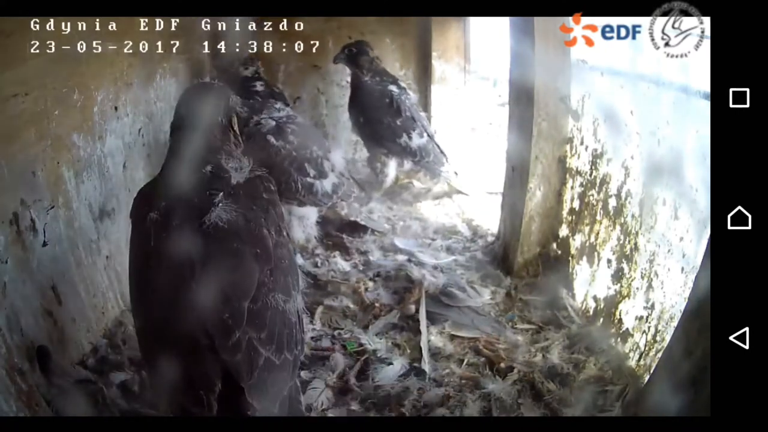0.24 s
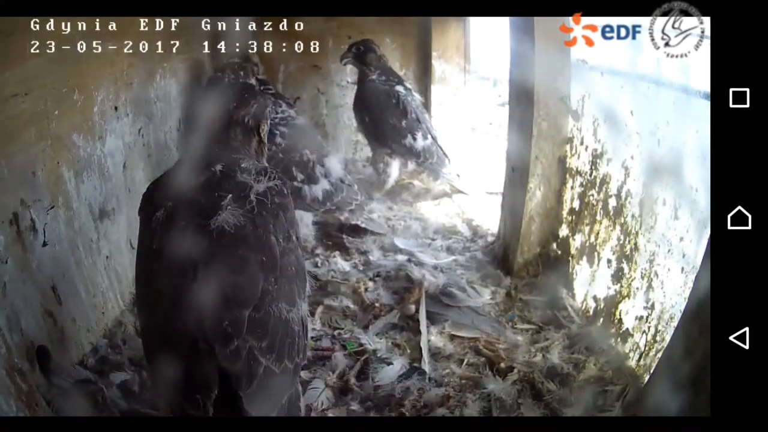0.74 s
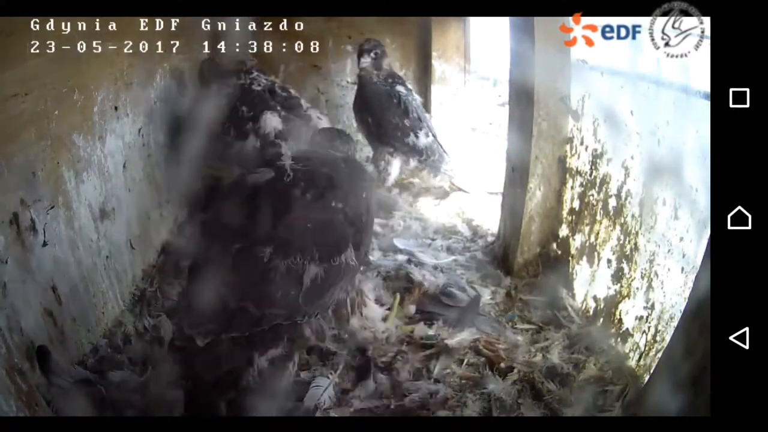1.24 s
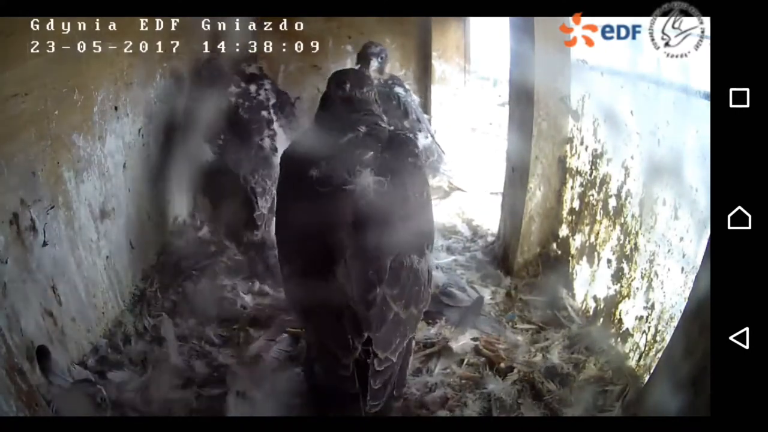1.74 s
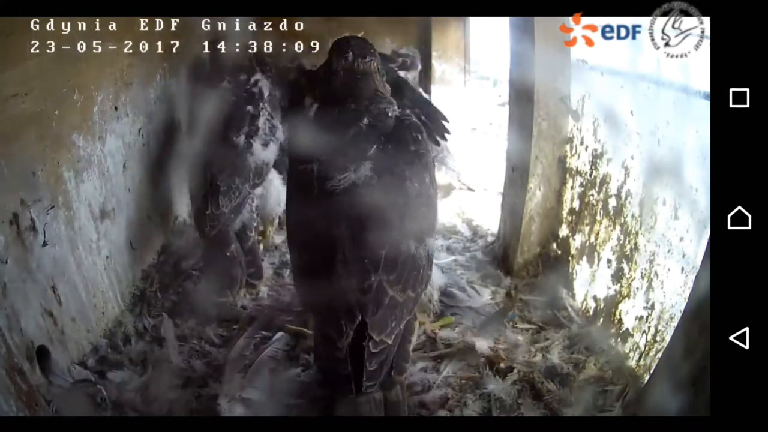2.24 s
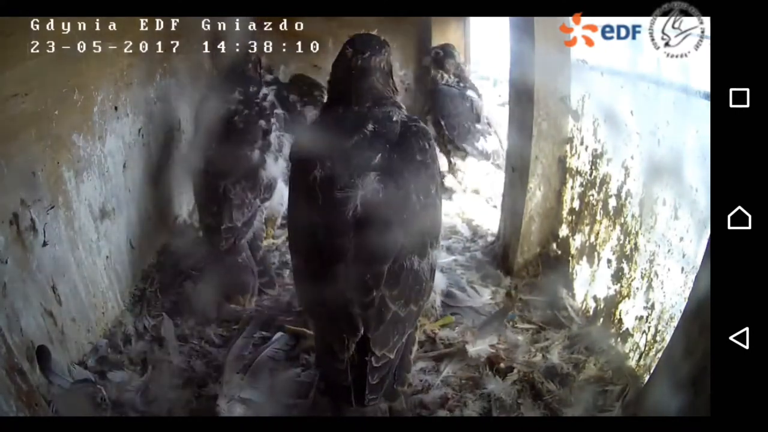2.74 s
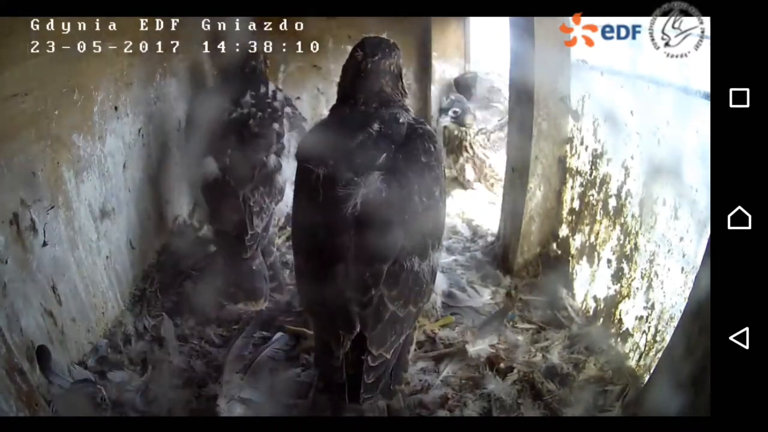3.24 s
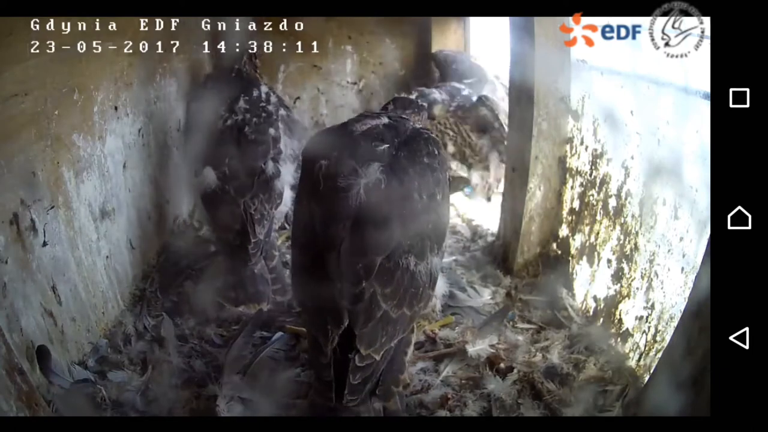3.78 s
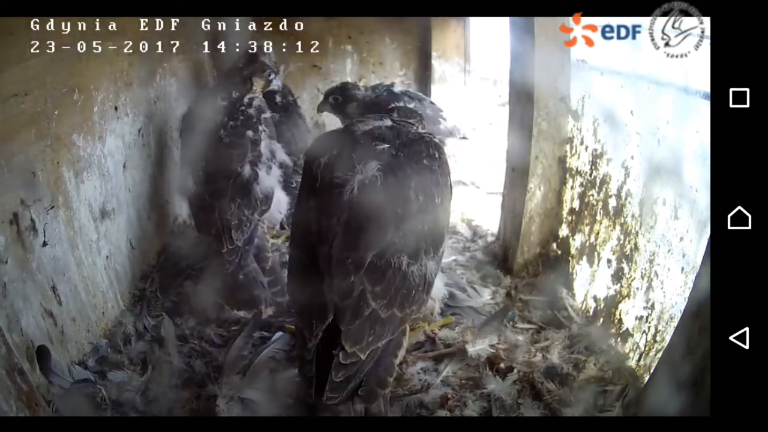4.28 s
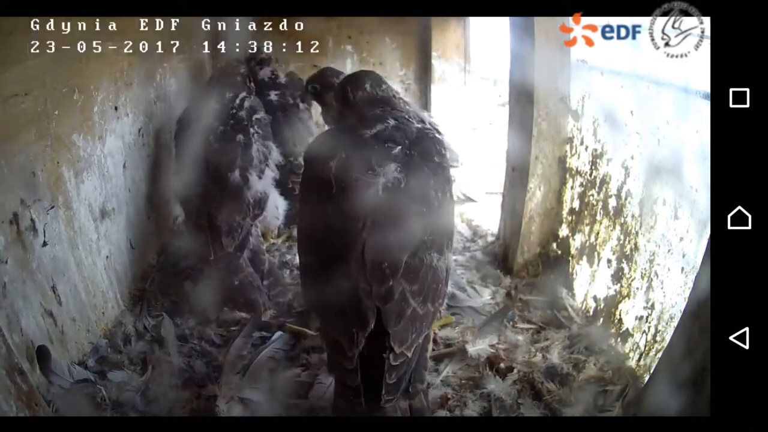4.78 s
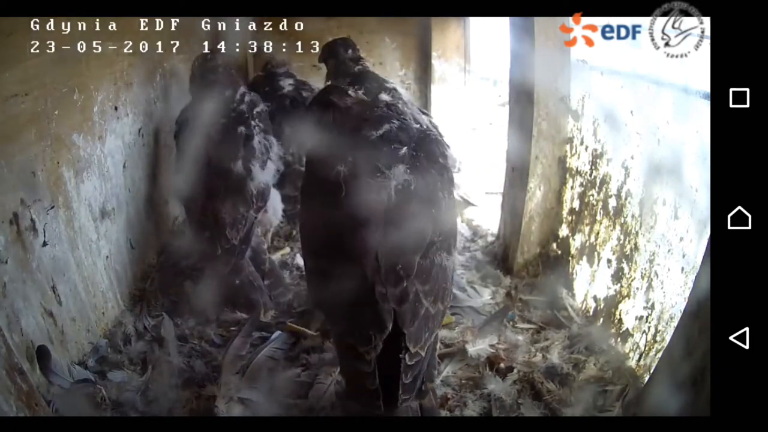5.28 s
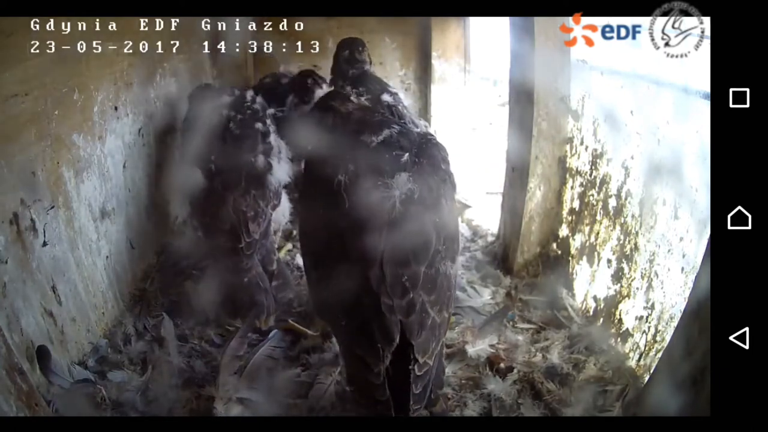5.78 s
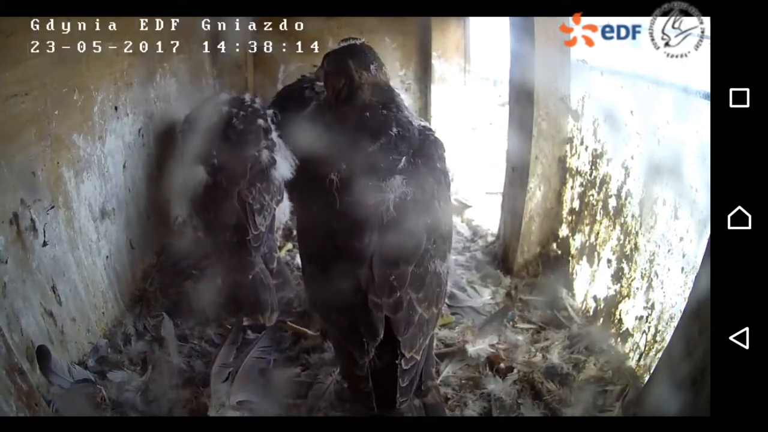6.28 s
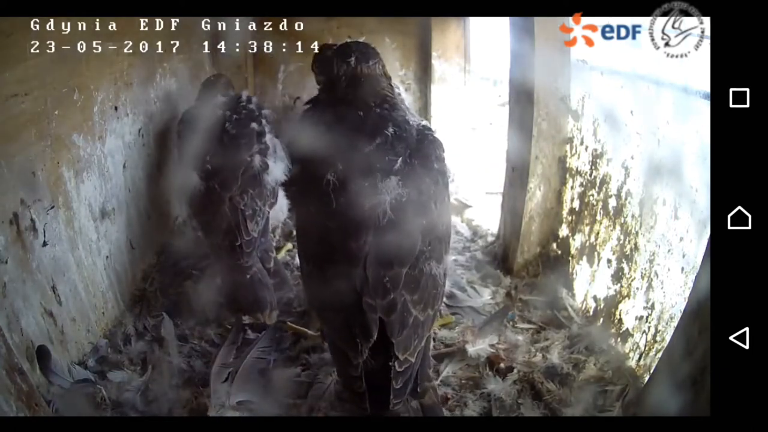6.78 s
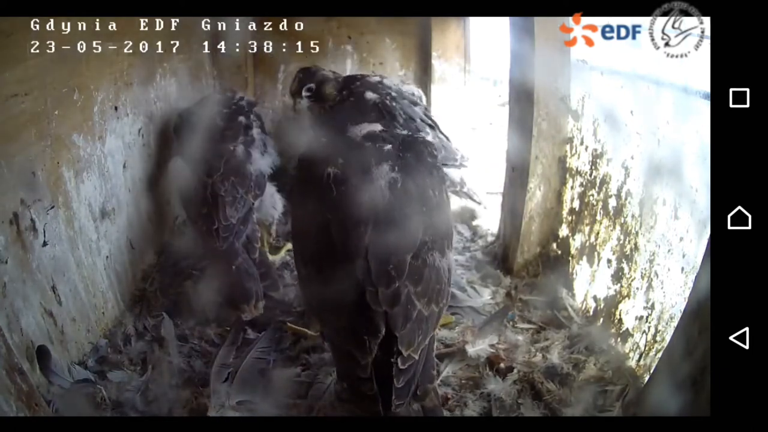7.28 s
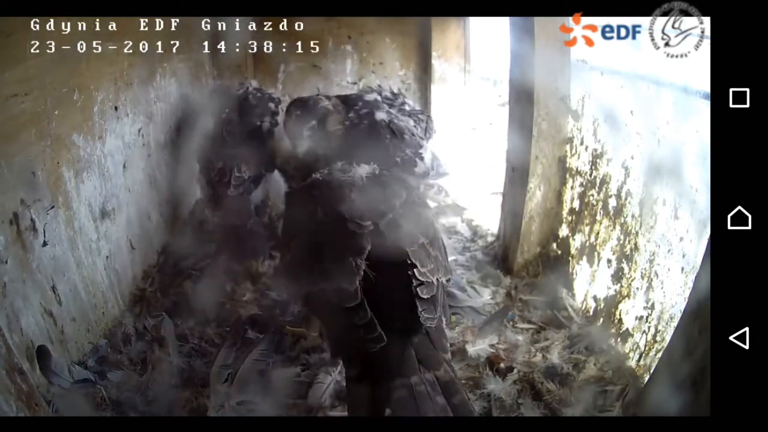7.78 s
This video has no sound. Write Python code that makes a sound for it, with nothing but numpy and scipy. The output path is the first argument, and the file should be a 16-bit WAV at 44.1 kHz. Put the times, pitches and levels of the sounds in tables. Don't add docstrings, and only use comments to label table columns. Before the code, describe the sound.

Hoarse, squealing cries of young birds of prey come one after another, with rustling litter, sharp wooden taps and low thuds between them. After a short lull, a more distant bird wails in a slow rise, then screeches twice more. A cheap loudspeaker rattles on the peaks, with low intermittent hum, steady hiss and a faint high whine.

```python
import sys
import numpy as np
from scipy import signal
from scipy.fft import rfft, irfft, next_fast_len
from scipy.io import wavfile
from scipy.ndimage import uniform_filter1d

SR = 44100
rng = np.random.default_rng(int(sys.argv[2]) if len(sys.argv) > 2 else 0)


def gain_from_db(level_db):
    decades = np.asarray(level_db, float) / 20
    return 10 ** decades


def transcribe(u):
    v = np.clip(np.atleast_2d(u).T, -1, 1)
    q = np.round(v * 32767).astype(np.int16)
    wavfile.write(sys.argv[1], SR, q)


N = 353682
T = np.arange(N) / SR

# frequency in Hz, density in dB per Hz.
RATTLE_SPECTRUM = [(2290, -109), (3900, 0.5), (4360, -7.5), (5240, -7.5), (5530, -12.5), (6410, -17),
                   (6640, -2.5), (6960, 5.5), (7470, -5.5), (7880, -6.5), (9020, -11.5), (9740, -29.5),
                   (11800, -16.5), (12900, -27), (16000, -27.5)]


def colour(x, points):
    hz, db = np.transpose(points)
    grid_hz = np.maximum(np.fft.rfftfreq(2048, 1 / SR), 1)
    cepstrum = irfft(np.interp(np.log(grid_hz), np.log(hz), db) * np.log(10) / 20)
    cepstrum[1:1024] *= 2
    cepstrum[1025:] = 0
    y = signal.fftconvolve(x, irfft(np.exp(rfft(cepstrum))))[:N]
    return y / np.std(y)


def band(x, lo_hz, hi_hz, order=2):
    return signal.sosfilt(signal.butter(order, [lo_hz, hi_hz], "bandpass", fs=SR, output="sos"), x)


def highpass(x, hz, order):
    return signal.sosfilt(signal.butter(order, hz, "highpass", fs=SR, output="sos"), x)


def wobble(hz, count=N, order=2):
    y = signal.sosfilt(signal.butter(order, hz, fs=SR, output="sos"), rng.standard_normal(count))
    return y / np.std(y)


def play(table, fade_s=0.0014, t=T):
    s, *columns = np.transpose(table)
    gate = np.clip(np.minimum(t - s[0], s[-1] - t) / fade_s, 0, 1)
    return gate, [np.interp(t, s, c) for c in columns]


def bump(t, width_s):
    return np.exp(-(t / width_s) ** 2)


def slow(v, size=3500):
    return np.sqrt(np.abs(uniform_filter1d(v ** 2, size=size)) + 1e-12)


def scuffle():
    # start in seconds, level in dB, t60 in seconds, brightness in dB. The dark rows at 5.24 and 5.42
    # s thicken the low part of the long scream.
    bursts = [(0.0, -44.5, 0.55, -11), (0.828, -46.5, 0.34, -4.5), (2.342, -25, 0.2, -17.5),
              (2.427, -38, 2.2, -15), (2.489, -35, 0.15, -15), (2.546, -30.5, 0.15, -16.5),
              (3.166, -25, 0.13, -13), (3.226, -37.5, 0.43, -18.5), (3.399, -45, 0.9, -18.5),
              (3.46, -34, 0.14, -16.5), (3.533, -39.5, 0.24, -30), (3.66, -49, 0.88, -21),
              (3.74, -54.5, 1.5, -27), (3.796, -24, 0.059, -8), (3.83, -52.5, 1.2, -6),
              (5.24, -46.5, 2, -30), (5.42, -45.5, 1.2, -31), (6.12, -51, 0.98, -17),
              (6.2, -69.5, 4.6, -22.5), (6.35, -53.5, 2.7, -30), (7.38, -46, 1.62, -16.5),
              (7.5, -64, 1.7, -26), (7.552, -48.5, 0.65, -7)]
    # frequency in Hz, density in dB per Hz.
    litter = [(88, -68), (150, -20.5), (225, -39), (274, -6.5), (326, -2.5), (583, 0.5), (960, 1),
              (1540, -6), (1950, -20.5), (2140, -13.5), (2400, -37.5), (3120, -69), (5280, -120)]
    attack_s, span = 0.003, 66000
    grains = rng.standard_normal(N) * gain_from_db(1.3 * wobble(46))
    rustle = colour(grains, litter)
    scratch = band(grains, 2090, 3090)
    scratch = scratch / np.std(scratch)
    out = np.zeros(N)
    for s, db, t60_s, bright_db in bursts:
        at = slice(int(s * SR), int(s * SR) + span)
        t = T[at] - s
        shape = np.clip(t / attack_s, 0, 1) * gain_from_db(db - 60 * t / max(t60_s, .02))
        out[at] += shape * (rustle[at] + gain_from_db(bright_db) * scratch[at])
    return out


def box(x):
    t60_s, wet_db = .085, -20
    t = T[:12000]
    tail = rng.standard_normal(len(t)) * gain_from_db(-60 * t / t60_s) * (t > .002)
    return x + gain_from_db(wet_db) * signal.fftconvolve(x, tail / np.sqrt(np.sum(tail ** 2)))[:N]


def pilot():
    # start in seconds, stop in seconds.
    awake = [(0, 0.056), (0.239, .87), (1.112, 1.73), (1.853, 3.345), (3.494, 3.9), (3.691, 3.72),
             (3.817, 3.87), (4.814, 6.17), (6.411, 7.43), (7.604, 8.02)]
    # time in seconds, level in dB.
    restarts = [(2.422, -40), (2.462, -42), (2.68, -35.5), (3.241, -44), (3.274, -38), (3.542, -40),
                (3.566, -34)]
    pilot_hz, pilot_db, second_db, third_db = 39.8, -47, -19, -24
    thump_hz, start_db, stop_db, lead_s = 64.6, -42.5, -41, .012
    hum, kicks = np.zeros(N), np.zeros(N)
    for start, stop in awake:
        turn = 2 * np.pi * pilot_hz * (T - start)
        tone = np.sin(turn) + gain_from_db(second_db) * np.sin(2 * turn) + gain_from_db(third_db) * np.sin(3 * turn)
        hum += np.clip(np.minimum(T - start, stop - T) / 0.0024, 0, 1) * tone
        kicks[int(start * SR)] = gain_from_db(start_db)
        kicks[min(int(stop * SR), N - 1)] = gain_from_db(stop_db)
    for s, db in restarts:
        kicks[int(s * SR)] = gain_from_db(db)
    t = T[:3000] - lead_s
    thump = np.cos(2 * np.pi * thump_hz * t) * bump(t, 0.013)
    low = gain_from_db(pilot_db) * hum + signal.fftconvolve(kicks, thump)[int(lead_s * SR):][:N]
    return highpass(low, 30, 3) - .0009


def floor():
    # frequency in Hz, density in dB per Hz.
    hiss_spectrum = [(76, -77), (130, -13.5), (418, -17.5), (511, -5), (554, -5.5), (1060, -3),
                     (1240, -12.5), (2410, -17), (4590, -17), (4980, -19), (8740, -16), (9480, -8),
                     (11600, -18), (14800, -21.5), (16000, -17)]
    hiss_db, whine_hz, whine_db, hum_hz, hum_db = -56.5, 9231, -61, 100, -72
    tones = gain_from_db(whine_db) * np.sin(2 * np.pi * whine_hz * T)
    tones += gain_from_db(hum_db) * np.sin(2 * np.pi * hum_hz * T)
    rumble = gain_from_db(-54) * band(rng.standard_normal(N), 35, 65)
    amplifier = gain_from_db(-57) * band(rng.standard_normal(N), 6600, 7600)
    hiss = gain_from_db(hiss_db + 0.22 * wobble(12)) * colour(rng.standard_normal(N), hiss_spectrum)
    return hiss + rumble + amplifier + tones


def partial(hz, hoarse, smear_hz):
    evenness = .08
    hoarse = np.clip(hoarse, 0, 1)
    tumble = wobble(1.19 * smear_hz, len(hz), 3) + 1j * wobble(1.69 * smear_hz, len(hz), 3)
    size = np.sqrt(2 * (1 - hoarse)) + np.sqrt(hoarse) * tumble
    size = size * (np.sqrt(2) / (np.abs(size) + 0.17)) ** evenness
    return (size * np.exp(2j * np.pi * np.cumsum(hz) / SR)).real


def effort(table, manner, slack, sag, speak_db, t):
    chirp_s, gulp_s, speak_s = 0.0087, 0.0059, 0.027
    release_db_s, shut_db_s = 1281, 1995
    chirp_db, gulp_db, *full_db = manner
    sag_share, sag_s = sag
    _, (hz, db, strain) = play(table, t=t)
    since, left = np.maximum(t - table[0][0], 0), table[-1][0] - t
    after = np.maximum(-left, 0)
    size = gain_from_db(db) + gain_from_db(chirp_db) * bump(since - chirp_s, chirp_s) + gain_from_db(gulp_db) * bump(left, gulp_s)
    clear = gain_from_db(db) / size
    hz = hz * (1 - sag_share * np.clip(1 - left / sag_s, 0, 1.8))
    db1 = 20 * np.log10(size) - release_db_s * after
    db2, air_db = (full + loss * (1 - strain) - shut_db_s * after for full, loss in zip(full_db, slack))
    db2 = db2 + speak_db * np.exp(-since / speak_s)
    return since, strain, clear, hz, db1, db2, air_db


def screams():
    # time in seconds, pitch in Hz, level in dB, strain 0-1.
    near_chick = [
        [(0.217, 902, -33.5, 0.42), (0.3, 931.6, -27, 0.52), (0.345, 1090, -19, 0.72), (0.42, 1130, -18, 0.83),
         (.5, 1125, -21, 0.83), (.56, 1138, -14, 1), (0.74, 1146, -17, 0.89), (0.793, 1121, -21.5, 0.99)],
        [(1.07, 890, -50, 0.63), (1.095, 900, -32, 0.24), (1.12, 900, -28, 0.2), (1.205, 998, -22, 0.69),
         (1.25, 1019, -14.5, 0.84), (1.4, 1081, -19.5, 0.78), (1.646, 1133, -18, 1)],
        [(1.826, 960, -32.5, 0.77), (1.92, 977.4, -21.5, 0.76), (2.0, 1060, -17.5, 0.9),
         (2.08, 1099, -23.5, 0.97), (2.19, 1022, -20, 0.4), (2.25, 1000, -26.5, 0.1), (2.34, 1097, -18, 0.44)],
        [(2.655, 960, -42.5, 0.58), (2.695, 936, -30.5, 0), (2.76, 956, -27.5, 0.33), (2.805, 1016, -22, 0.7),
         (2.94, 1069, -19.5, 0.92), (3.0, 1035, -17.5, 0.92), (3.05, 1121, -14.5, 0.86),
         (3.115, 1088, -26.5, 0.96), (3.148, 1096, -6.5, 0.92)],
    ]
    far_chick = [
        [(4.793, 885, -42.5, 0.37), (4.83, 935, -38, 0.045), (5.03, 1006, -38.5, 0.17),
         (5.22, 1015, -35.5, 0.4), (5.555, 1013, -32.5, 0.39), (5.7, 1028, -35.5, 0.54),
         (5.77, 1110, -32, 0.65), (5.85, 1168, -29.5, 0.72), (5.92, 1253, -31.5, 0.79),
         (6.055, 1293, -21.5, 0.79), (6.108, 1254, -21, 0.68)],
        [(6.386, 957, -52.5, 0.23), (6.416, 1042, -36.5, 0.63), (6.468, 1115, -34, 0.55),
         (6.55, 1177, -33.5, 0.6), (6.65, 1257, -30.5, 0.76), (6.82, 1211, -24, 0.83), (7.01, 1222, -28, 0.95),
         (7.04, 1227, -20.5, 0.85), (7.19, 1260, -23, 1), (7.36, 1272, -18.5, 0.91)],
        [(7.588, 1030, -16, 0.16), (7.625, 1140, -26.5, 0.94), (7.68, 1195, -32.5, 0.78),
         (7.76, 1209, -21, 0.85), (7.81, 1205, -24, 0.88), (7.88, 1218, -27, 0.8), (7.95, 1202, -21.5, 0.89),
         (8.1, 1214, -36, 0.9)],
    ]
    # time in seconds, pitch in Hz, level in dB.
    upper_voice = [
        [(0.236, 2740, -55.5), (0.329, 2890, -36.5), (0.44, 2945, -44.5), (0.52, 3056, -34.5),
         (0.6, 2950, -35.5), (0.795, 3016, -36.5), (0.81, 2760, -34)],
        [(1.075, 2638, -49), (1.253, 2890, -38.5), (1.345, 2886, -32), (1.4, 2790, -28.5), (1.48, 2924, -33),
         (1.64, 2967, -32), (1.67, 2850, -43)],
        [(1.84, 2715, -43), (1.9, 2742, -35.5), (1.96, 2850, -32.5), (2.03, 2945, -37.5), (2.08, 2920, -32.5),
         (2.12, 3020, -30.5), (2.17, 2903, -33), (2.243, 3168, -45), (2.3, 2890, -38), (2.335, 2790, -46)],
        [(2.66, 2800, -38.5), (2.69, 2975, -33.5), (2.778, 2765, -31), (2.8, 3075, -28.5), (2.86, 2950, -28.5),
         (2.93, 3060, -25), (2.985, 2911, -41), (3.05, 3462, -32), (3.14, 2940, -51)],
        [(5.04, 2850, -53.5), (5.2, 3036, -46.5), (5.26, 3199, -48.5), (5.38, 3130, -45.5), (5.6, 3168, -44.5),
         (5.72, 3258, -45.5), (5.85, 3430, -45.5), (5.98, 3547, -45.5), (6.1, 3500, -56)],
        [(6.4, 3000, -57), (6.49, 3273, -50.5), (6.76, 3553, -46.5), (7.034, 3582, -47), (7.37, 3703, -44)],
        [(7.6, 3324, -50), (7.66, 3400, -42.5), (7.69, 3560, -42), (7.75, 3620, -41.5), (7.81, 3500, -55.5),
         (7.87, 3330, -46), (7.95, 3400, -50.5), (7.98, 3640, -41.5), (8.02, 3650, -44)],
    ]
    # opening chirp in dB, closing gulp in dB, second partial and breath in dB at full strain.
    manners = [(-25, -5, -27.5, -33.5), (-57, -11, -28, -34), (-16, -48.5, -32, -36.5),
               (-56, -26, -26.5, -34), (-66, -32, -30.5, -43.5), (-52.5, -30.5, -29, -40.5),
               (-38, -50, -26, -38.5)]
    # hoarseness 0-1 of first partial, second partial and upper voice, smear in Hz,
    # third and fourth partial in dB.
    hoarseness = [(.58, .3, .3, 75, -5, -25), (.65, .5, .25, 75, -9, -25), (.65, .35, .15, 85, -12, -25),
                  (.55, .3, .25, 80, -12, -25), (1, .18, .55, 135, -30, -5), (.8, .14, .8, 62, -30, -25),
                  (.65, .07, .6, 65, -30, -25)]
    speak = [30, 4.5, 3.5, -1, 11.5, 7.5, -25.5]
    late = [0.01, .001, 0.0074, .001, .001, 0.00095, 0.02]
    chest = [-15.5, -29, -23, -18, -0.5, -8, -21.5]
    # start in seconds, length in seconds, level in dB.
    lapses = [(.53, .22, -8), (1.2, .17, -5), (2.125, .2, -6), (2.78, .15, -4), (5.06, .11, -6),
              (5.4, .15, -3), (6.54, .12, -11), (7.655, .015, -8), (7.785, .06, -12), (7.93, .03, -6)]
    # frequency in Hz, density in dB per Hz.
    breath_spectrum = [(88, -43.5), (150, -76), (238, -19.5), (519, -21), (596, -16), (715, -5), (958, -4),
                       (1230, 6), (1460, -2.5), (1580, 0), (2030, -9.5), (2400, -14), (2580, -6),
                       (3130, -1), (4200, -26), (5460, -76), (9240, -120)]
    # time in seconds, pitch in Hz, level in dB.
    sibling_call = [
        (7.78, 890, -40),
        (7.816, 889, -25),
        (7.87, 924, -26),
        (7.972, 930, -30.5),
        (8.02, 972, -31),
    ]
    lead, span = 2000, 66000
    throat_hz, lift = 1006.5, .025
    focus = .55
    between_db, break_hz, break_db = -9.5, 22, -8
    throb_db, throb_hz, rasp_db, rasp_hz = 1.7, 28, 1.67, 75

    voice = np.zeros(N + span)
    breath = np.resize(colour(rng.standard_normal(N), breath_spectrum), N + span)
    dark, bright = band(breath, 150, 2000), band(breath, 2390, 5300)
    deep = breath - highpass(breath, 480, 4)
    rows = zip(near_chick + far_chick, manners, speak, late, chest, upper_voice, hoarseness)
    for i, (table, manner, speak_db, late_s, chest_db, other, rough) in enumerate(rows):
        first, second, upper, smear_hz, third_db, fourth_db = rough
        near = i < len(near_chick)
        slack = (-42.5, -14.5) if near else (-27, -15.5)
        sag = (0.1, .035) if near else (.14, .016)
        chest_s = 0.17 if near else 0.014
        at = int(table[0][0] * SR) - lead + np.arange(span)
        t = at / SR
        flutter, shake = gain_from_db(0.97 * wobble(50, span)), 1 + .005 * wobble(64.0, span)
        since, strain, clear, hz, db1, db2, air_db = effort(table, manner, slack, sag, speak_db, t)

        db2 = db2 + break_db * np.clip(2 * (wobble(break_hz, span) - .7), 0, 1)
        for s, length_s, db in lapses:
            db2 = db2 + db * np.exp(-((t - s) * 2 / length_s - 1) ** 4)
        if not near:
            first = first * (1 - focus * strain ** 2)
        scoop = 1 - .06 * np.exp(-since / .012)
        hz = hz * scoop
        first_hz = np.maximum(hz * (1 + lift * strain), throat_hz * scoop * near)
        throb = throb_db * wobble(throb_hz, span) * clear ** 2
        tones = gain_from_db(db1 - 2.0 + throb) * partial(first_hz * shake, first * clear, smear_hz)
        joined = np.clip((since - late_s) / 0.003, 0, 1)
        tones += joined * gain_from_db(db2 + 7.0) * partial(2 * hz * shake, second, min(smear_hz, 100))
        third_in = np.clip(since / 0.13 - .5, 0, 1)
        tones += third_in * gain_from_db(db2 + 2.5 + third_db) * partial(3 * hz * shake, second, smear_hz)
        tones += gain_from_db(db2 - 2.5 + fourth_db) * partial(4 * hz * shake, second, 100)

        open_up, (up_hz, up_db) = play(other, fade_s=0.012, t=t)
        up_level = gain_from_db(up_db + 7.0 + 2.06 * wobble(18, span))
        tones += open_up * up_level * partial(up_hz * shake, upper, smear_hz)
        beat_level = gain_from_db((db2 + up_db) / 2 + 7.5 + between_db)
        tones += open_up * beat_level * partial(up_hz - hz, 1.0, smear_hz)

        air = breath[at] - bright[at] * bump(since, 0.13)
        air = air - dark[at] * np.exp(-since / chest_s)
        air = air - deep[at] * np.clip(1.1 - strain, 0, 1)
        air = (air + gain_from_db(chest_db) * deep[at]) * gain_from_db(rasp_db * wobble(rasp_hz, span))
        air = np.clip(since / 0.073, 0, 1) * air
        gate = np.clip(since / 0.0095, 0, 1)
        voice[at] += gate * flutter * (tones + gain_from_db(air_db + 12.0) * air)
    gate, (hz, db) = play(sibling_call, fade_s=0.017)
    sibling = partial(hz, 0.54, 70.5) + gain_from_db(-13) * partial(2 * hz, 0.15, 90)
    return voice[:N] + gate * gain_from_db(db) * sibling


def striking():
    # start in seconds, length in seconds, level in dB.
    near_spells = [(0.336, 0.001, -40), (0.34, 0.021, -46.5), (0.371, 0.0021, -40.5), (0.38, 0.0018, -44),
                   (0.388, 0.013, -51), (0.405, 0.04, -40), (0.455, 0.29, -39), (0.753, 0.049, -37.5),
                   (1.234, 0.024, -49), (1.264, 0.0078, -41), (1.279, 0.029, -44), (1.316, 0.0026, -37),
                   (1.323, 0.026, -45), (1.355, 0.007, -42), (1.369, 0.011, -48), (1.386, 0.016, -41),
                   (1.406, 0.015, -40), (1.435, 0.04, -39), (1.48, 0.025, -39.5), (1.513, 0.012, -38),
                   (1.536, 0.12, -38.5), (1.929, 0.0016, -44), (1.939, 0.0088, -42.5), (1.97, 0.001, -44),
                   (1.981, 0.0085, -52), (1.998, 0.0017, -41), (2.006, 0.0017, -40), (2.016, 0.019, -44),
                   (2.044, 0.0015, -37), (2.057, 0.043, -37), (2.102, 0.019, -43.0), (2.126, 0.0059, -41),
                   (2.8, 0.0023, -40), (2.809, .002, -48), (2.817, 0.003, -45), (2.828, .002, -48),
                   (2.839, 0.0018, -43), (2.849, .003, -45.5), (2.854, 0.004, -44.5), (2.868, 0.019, -41.5),
                   (2.891, .05, -38), (2.948, .035, -38), (2.987, 0.027, -38.5), (3.014, 0.059, -35.5),
                   (3.074, .065, -36.5), (3.15, 0.011, -43.5)]
    # start in seconds, length in seconds, level in dB.
    far_spells = [(6.714, 0.003, -49.0), (6.737, 0.006, -42.0), (6.787, 0.013, -43.0),
                  (6.807, 0.011, -48.0), (6.832, 0.045, -41.0), (6.886, 0.01, -40.0), (6.913, 0.042, -38.0),
                  (6.966, 0.1, -38.0), (7.073, 0.028, -41.0), (7.106, 0.12, -38.0), (7.234, 0.13, -38.0),
                  (7.633, 0.013, -39.0), (7.67, 0.029, -41.0), (7.709, 0.048, -38.0), (7.763, 0.008, -45.0),
                  (7.778, 0.007, -48.0), (7.805, 0.004, -47.0), (7.829, 0.01, -51.0), (7.85, 0.008, -49.0),
                  (7.868, 0.008, -47.0), (7.886, 0.021, -39.0), (7.913, 0.107, -40.0)]
    out = np.zeros(N)
    for s, length_s, db in near_spells + far_spells:
        out[int(s * SR):int((s + length_s) * SR)] = gain_from_db(db)
    return uniform_filter1d(out, size=30)


def loudspeaker(x, strength):
    # multiple, level in dB.
    overload = [(2, -14), (2.5, -6), (5, -19)]
    stop_ratio, clack_db, link_hz = 1.155, 3, 8000
    mirror_db, beat_db, third_db = 0, 0.5, 10
    swing = slow(x, size=500)
    reach = stop_ratio * swing * gain_from_db(1.87 * wobble(52))
    excess = x - np.clip(x, -reach, reach)
    excess = slow(x) * np.tanh(excess / (0.071 * swing))
    over = slow(excess, size=100)
    mirror = over * band(x, 1450, 2310, order=4) / slow(x) * np.cos(2 * np.pi * link_hz * T)
    ticks, mirror = highpass([np.diff(excess, prepend=0), mirror], 3900, 6)
    buzz = ticks / np.std(ticks) + gain_from_db(mirror_db) * mirror / np.std(mirror)
    buzz = colour(buzz, RATTLE_SPECTRUM)
    rattle = buzz / (slow(buzz, size=1500) + 0.027)

    whistle = signal.hilbert(band(x, 2280, 2620), next_fast_len(N))[:N]
    turn = np.unwrap(np.angle(whistle))
    lead = np.clip(np.abs(whistle) / swing, 0, 1.2) ** 2
    rattle += lead * sum(gain_from_db(db) * np.cos(round(2 * k) / 2 * turn) for k, db in overload)
    beats = band(np.abs(excess), 330, 970)
    rattle += gain_from_db(beat_db) * beats / (slow(beats) + 1.56 * np.std(beats))

    push = band(x, 2180, 2640, order=3)
    unit = push / (slow(push, size=200) + 0.0029)
    third = gain_from_db(third_db) * band(unit * push ** 2, 6000, 8000, order=3)
    return gain_from_db(clack_db) * strength * rattle + third


def knocks():
    # time in seconds, ring in dB, ring in Hz, crack in dB, t60 in seconds.
    blows = [(1.096, -40.5, 3150, -32, 0.032), (2.331, -24.5, 1650, -62, 0.035),
             (2.338, -25.5, 1180, -48, .046), (2.428, -48.5, 798, -72, 0.17),
             (2.467, -41, 2090, -56, 0.0646), (2.489, -29, 1085, -38, 0.039),
             (2.545, -32.5, 924, -35, 0.0375), (3.229, -20, 1050, -43, 0.014),
             (3.275, -34.5, 312, -67, .08), (3.296, -35.5, 300, -67, 0.08), (3.399, -38, 730, -62, 0.048),
             (3.462, -31, 930, -56, 0.055), (3.534, -39.5, 376, -68, 0.0424), (3.666, -37, 730, -50, 0.064),
             (3.737, -41.5, 710, -56, 0.066), (3.779, -38, 747, -74.5, 0.11),
             (3.795, -18, 1002, -24, 0.047), (3.811, -26, 864, -71, 0.031), (3.915, -42, 853, -48, 0.07),
             (4.399, -59, 965, -39.5, .065), (7.552, -38.5, 813, -54, 0.043),
             (7.593, -35.5, 2055, -32, 0.035)]
    out, t = np.zeros(N), T[:4000]
    noises = band(rng.standard_normal((len(blows), len(t))), 2200, 2500)
    for (s, ring_db, hz, crack_db, t60_s), noise in zip(blows, noises):
        ring = gain_from_db(ring_db + 6.0 - 60 * t / max(t60_s, .01)) * np.sin(2 * np.pi * hz * t)
        crack = (6.0 * noise + np.sin(2 * np.pi * 3250 * t)) * np.exp(-t / 0.0022)
        hit = (1 - np.exp(-t / 0.00043)) * (ring + gain_from_db(crack_db + 1.0) * crack)
        out[int(s * SR):][:len(t)] += hit
    return out


def contacts():
    # time in seconds, level in dB.
    clacks = [(5.819, -38), (5.84, -56), (5.949, -48), (5.962, -43), (6.073, -35), (6.097, -37),
              (1.195, -50), (1.836, -46), (2.336, -47)]
    width_s = 0.0014
    level = sum(gain_from_db(db) * bump(T - s, width_s) for s, db in clacks)
    return level * colour(rng.standard_normal(N), RATTLE_SPECTRUM)


def thuds():
    # time in seconds, peak in dB, ring in Hz, t60 in seconds.
    steps = [
        (2.334, -18.5, 556, 0.024),
        (2.342, -24.5, 322, 0.037),
        (2.574, -37, 370, 0.053),
        (2.709, -25.5, 351, 0.022),
        (2.711, -30, 530, 0.04),
    ]
    out, t = np.zeros(N), T[:5000]
    for s, db, hz, t60_s in steps:
        boom = gain_from_db(db + 7.5 - 60 * t / t60_s) * np.sin(2 * np.pi * hz * t)
        out[int(s * SR):][:len(t)] += (1 - np.exp(-t / 0.002)) * boom
    return out


def cone_response(x):
    # frequency in Hz, sharpness Q, level in dB.
    resonances = [(370, 12, -2), (850, 12, -12), (1670, 20, -4), (1850, 20, -2), (2760, 16, -7)]
    # frequency in Hz, sharpness Q, share lost.
    hollows = [(1540, 12, .6), (1762, 30, .6), (2010, 30, .3)]
    y = signal.lfilter(*signal.iirnotch(2376, 12, fs=SR), x)
    y = 0.46 * y + 0.38 * signal.lfilter(*signal.iirnotch(1470, 7, fs=SR), y)
    y = y + sum(gain_from_db(db) * signal.lfilter(*signal.iirpeak(hz, q, fs=SR), y) for hz, q, db in resonances)
    y = y - sum(share * signal.lfilter(*signal.iirpeak(hz, q, fs=SR), y) for hz, q, share in hollows)
    return highpass(y, 260, 4)


def scene():
    nest = box(screams() + scuffle() + knocks() + thuds())
    camera = np.tanh(3.213 * nest) / 2.914
    link = signal.sosfilt(signal.ellip(8, .5, 60, 3800, fs=SR, output="sos"), camera)
    front = cone_response(link)
    return (front + loudspeaker(link, striking()) + contacts() + pilot() + floor())[None]


def band_limit(x):
    return signal.sosfilt(signal.butter(12, 16220, fs=SR, output="sos"), x)


def record(dry):
    mix = signal.sosfilt(signal.ellip(10, .2, 70, 15850, fs=SR, output="sos"), dry)
    return band_limit(mix)


dry = scene()
out = record(dry)
transcribe(out)
```